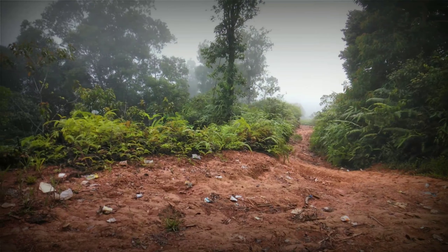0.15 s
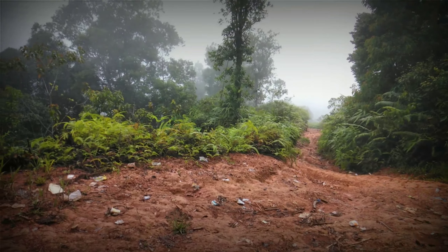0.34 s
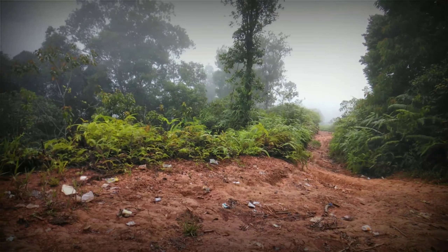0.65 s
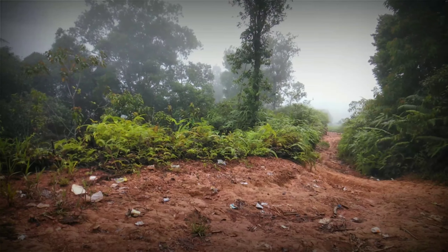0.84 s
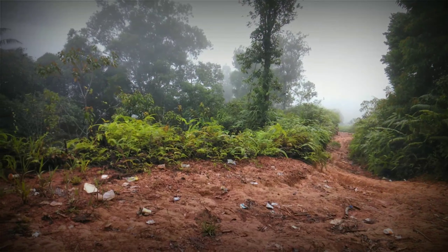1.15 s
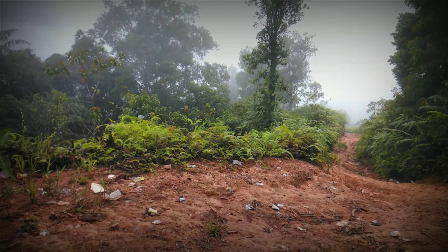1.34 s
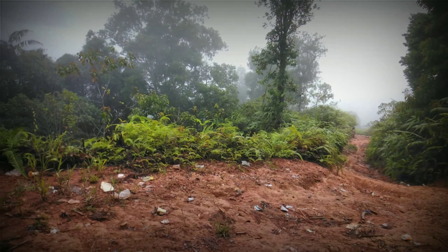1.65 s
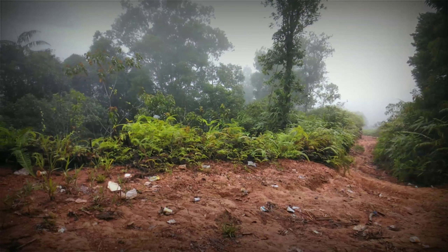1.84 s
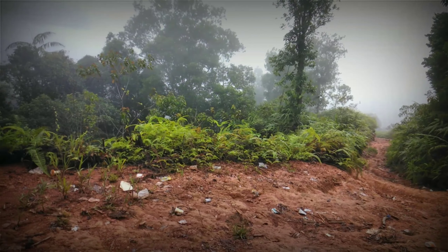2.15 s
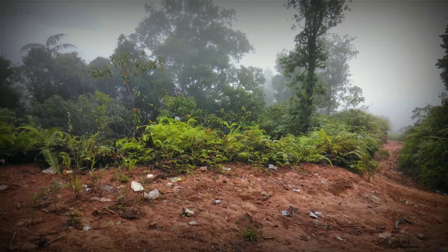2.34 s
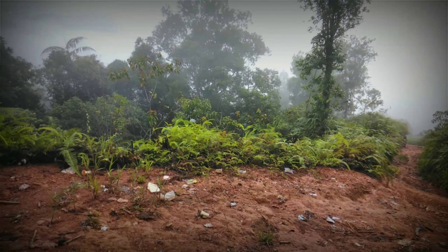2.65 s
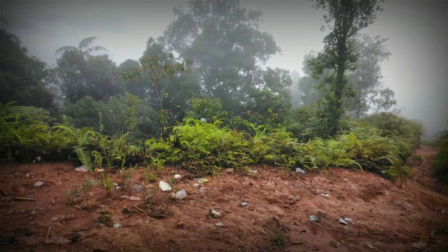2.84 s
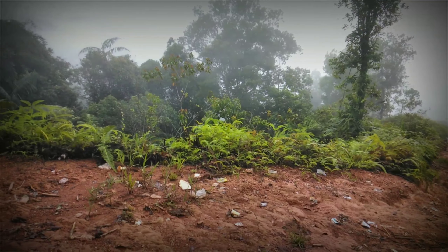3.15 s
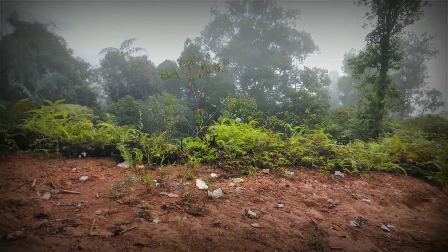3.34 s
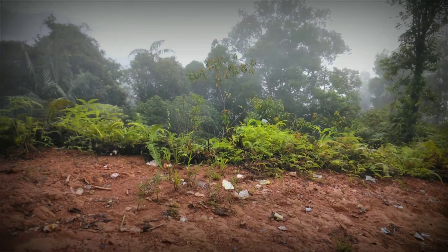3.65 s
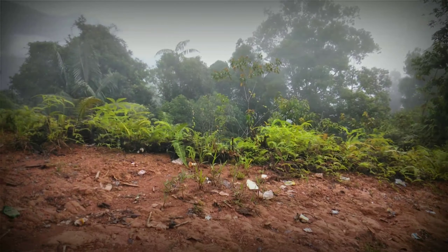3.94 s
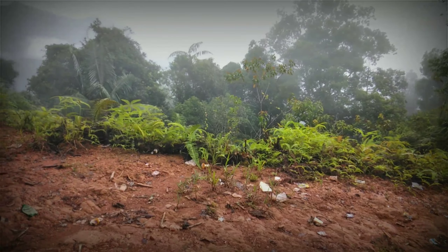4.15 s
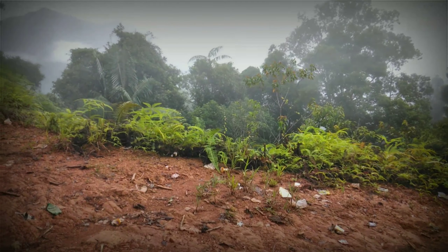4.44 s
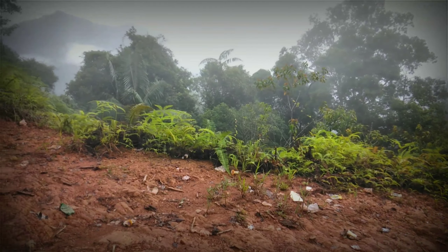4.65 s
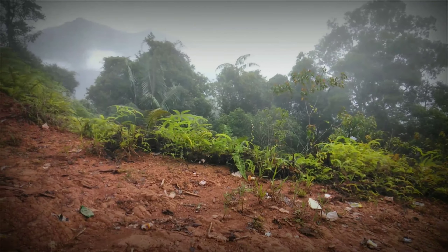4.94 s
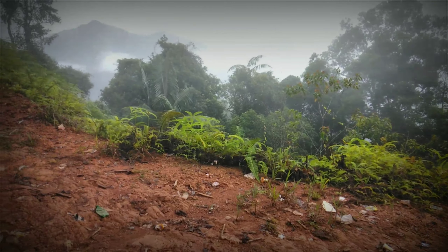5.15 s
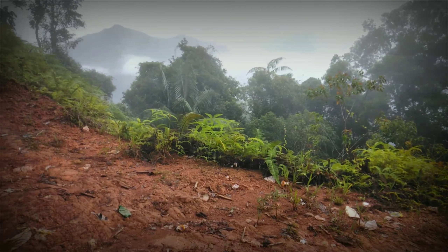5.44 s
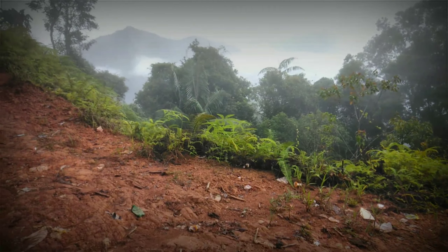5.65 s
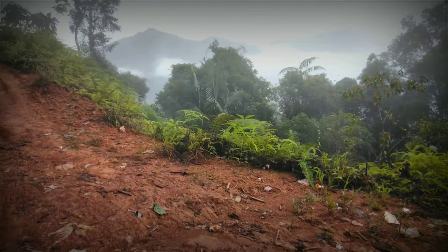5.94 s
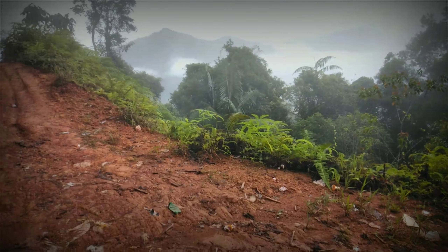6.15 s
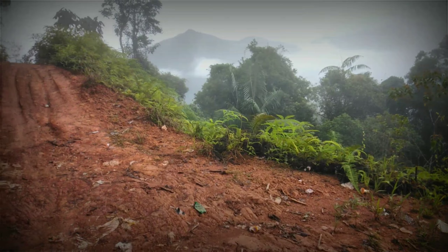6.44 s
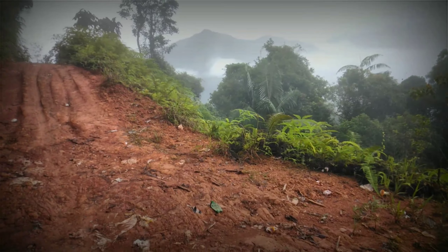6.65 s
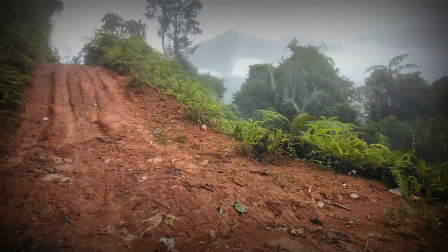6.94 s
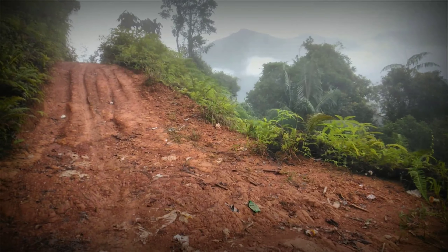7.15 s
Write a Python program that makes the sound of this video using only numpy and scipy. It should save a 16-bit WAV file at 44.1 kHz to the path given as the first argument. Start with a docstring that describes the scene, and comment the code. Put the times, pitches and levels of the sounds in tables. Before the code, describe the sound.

Insects trill, chirp and tick over a high hiss in a forest, with a brief rising birdcall and a few gritty shoe scuffs.

```python
"""Insects on a misty forest ridge. From the start, over a hissing chorus and low air, a cricket's wings
chirp falling double notes, a katydid's wing teeth tick very high and shoes shift on a gritty track.
Near 1 s a throbbing trill emerges and a bird whistles a rising phrase among the trees. Near 3 s thin
rising buzzes pass overhead. From 5.5 s the shoes crunch harder, the bird calls faintly, a higher trill
joins and the ticks grow stronger; the buzzes return near 7 s."""
import sys
import numpy as np
from scipy import signal
from scipy.fft import rfft, irfft, next_fast_len
from scipy.io import wavfile

SR = 44100
rng = np.random.default_rng(int(sys.argv[2]) if len(sys.argv) > 2 else 0)


def generate_wav(sig):
    """Save sig (samples, or channels by samples) to the path in sys.argv[1] as 16-bit PCM at SR."""
    pcm = np.round(np.clip(np.atleast_2d(sig).T, -1, 1) * 32767).astype(np.int16)
    wavfile.write(sys.argv[1], SR, pcm)


N = 321481


def from_db(db):
    """Decibels to gain."""
    return 10 ** (np.asarray(db) / 20)


def rms_one(x):
    """Scale to unit rms."""
    return x / np.sqrt(np.mean(x ** 2) + 1e-20)


def at(rows, s):
    """Value of a two-column curve at time s."""
    return np.interp(s, *np.transpose(rows))


def in_time(rows):
    """Columns of a curve table at every sample."""
    s, *columns = np.transpose(rows)
    return [np.interp(np.arange(N) / SR, s, c) for c in columns]


def add(out, s, sound):
    """Mix a sound in at time s."""
    i = round(s * SR)
    part = sound[max(-i, 0):max(N - i, 0)]
    out[max(i, 0):max(i, 0) + len(part)] += part


def beats(lag, period_s):
    """Start times of an even rhythm shifted by a lag curve."""
    even = np.arange(int(N / SR / period_s) + 1) * period_s
    return even + at(lag, even)


def drift(rate_hz, size=N):
    """Random wander, spread about 1."""
    steps = np.arange(size) * rate_hz * 2 / SR
    knots = rng.standard_normal(int(steps[-1]) + 2)
    return np.interp(steps, np.arange(len(knots)), knots) * np.sqrt(3 / 2)


def colour(x, spectrum):
    """Shape by a spectrum that falls away past its ends; white noise keeps its power."""
    size = next_fast_len(len(x))
    hz, db = np.transpose(spectrum)
    f = np.fft.rfftfreq(size, 1 / SR) + 1
    outside = np.abs(np.log(f / np.clip(f, hz[0], hz[-1])))
    gain = from_db(np.interp(np.log(f), np.log(hz), db) - 200 * outside)
    return irfft(rfft(x, size) * rms_one(gain), size)[:len(x)]


def noise_band(spectrum, flicker_db, rate_hz):
    """Flickering coloured noise at unit rms."""
    noise = rng.standard_normal(N) * from_db(flicker_db * drift(rate_hz))
    return rms_one(colour(noise, spectrum))


def forest(x, t60_s, wet_db):
    """Trunks and leaves scatter a dying tail behind the direct sound."""
    t = np.arange(SR) / SR
    tail = rng.standard_normal(SR) * from_db(-60 * t / t60_s) * (1 - np.exp(-t / 0.0069))
    return x + from_db(wet_db) * signal.fftconvolve(x, tail / np.linalg.norm(tail))[:N]


def glides(rows, waver, waver_hz, bend):
    """Gliding whistles; a fast pitch waver turns them into buzzes."""
    out = np.zeros(N)
    for start_s, length_s, from_hz, to_hz, db in rows:
        u = np.linspace(0, 1, int(length_s * SR))
        pitch_hz = (from_hz + (to_hz - from_hz) * u ** bend) * (1 + waver * drift(waver_hz, len(u)))
        swell = np.abs(np.sin(np.pi * u)) ** 0.5 * from_db(2 * drift(65, len(u)))
        add(out, start_s, from_db(db) * swell * np.sin(2 * np.pi * np.cumsum(pitch_hz) / SR))
    return out


def air():
    """Air stirs with a low rumble."""
    spectrum = [(8, 29), (18, 22.5), (30, 14), (60, 8), (100, 5.5), (165, 7), (205, 1.5), (250, -4),
                (400, -4), (700, -4), (1100, -7), (1450, -7), (3500, -12), (16000, -16)]  # freq_hz, relative_db
    return from_db(-45.7) * noise_band(spectrum, flicker_db=1.2, rate_hz=12)


def chorus():
    """Far trills, crickets and a high hiss: many voices merge into bands of noise."""
    # band spectra: freq_hz, relative_db
    trill_band = [(4700, -33), (5200, -17), (5500, -7.5), (5750, -6), (5900, -6), (6100, -1.5), (6300, 0),
                  (6600, 3), (6850, -2.5), (7030, -5.5), (7150, -17), (7500, -23.5), (7900, -43.5)]
    cricket_band = [(3650, -21), (3950, -5), (4150, 1), (4280, -1), (4450, -2.5), (4750, -17.5),
                    (5100, -25.5)]
    hiss_band = [(10000, -27), (11700, -16.5), (12500, -9.5), (13500, -3.5), (14300, -6.5), (15000, 1),
                 (16000, 1)]
    hiss_level = [(0, -45), (2.5, -44), (4, -44.5), (5.6, -42.5), (7.3, -44.5)]  # time_s, level_db
    trills = from_db(-44) * noise_band(trill_band, flicker_db=1, rate_hz=110)
    crickets = from_db(-58) * noise_band(cricket_band, flicker_db=0.5, rate_hz=27)
    hiss = from_db(in_time(hiss_level)[0]) * noise_band(hiss_band, flicker_db=2.5, rate_hz=250)
    return trills + crickets + hiss


def high_singers():
    """Far insects: a thin 8 kHz band and a 15 kHz sizzle swell almost together."""
    # band spectra: freq_hz, relative_db
    thin_band = [(7400, -15), (7900, -4), (8270, 1.5), (8430, -4), (8600, -17)]
    sizzle_band = [(14000, -16), (14600, -9), (15000, 1), (15350, -2.5), (16000, 1)]
    swells = [(0, -66, -42), (.4, -71, -47.5), (.9, -68, -46), (1.45, -64, -40), (2.6, -60, -40),
              (3, -61, -44), (3.9, -66, -42), (4.7, -73, -46.5), (5.8, -68, -45), (6.3, -62.5, -41.5),
              (7.3, -64, -42.5)]  # time_s, thin_db, sizzle_db
    thin_gain, sizzle_gain = from_db(in_time(swells))
    thin = thin_gain * from_db(0.1) * noise_band(thin_band, flicker_db=0.5, rate_hz=75)
    return thin + sizzle_gain * noise_band(sizzle_band, flicker_db=0.3, rate_hz=170)


def bird():
    """Whistled notes, mostly rising, ring among the trees."""
    notes = [(1.01, 0.059, 2410, 2430, -54), (1.08, 0.098, 2590, 2707, -49.5),
             (1.17, 0.09, 2980, 3250, -44), (1.245, 0.048, 3674, 3785, -40.5),
             (1.355, 0.056, 3180, 3280, -41.5), (1.385, 0.037, 3280, 3460, -41.5),
             (5.525, 0.04, 2730, 3140, -51.5), (5.72, 0.062, 2080, 2040, -58),
             (5.825, .04, 2054, 2080, -55.5)]  # start_s, length_s, from_hz, to_hz, level_db
    return forest(glides(notes, waver=0.013, waver_hz=123, bend=0.66), t60_s=0.654, wet_db=-1.5)


def buzzes():
    """Thin glides overhead, roughened by a fast pitch waver."""
    notes = [(2.78, .12, 7620, 8150, -45), (2.87, 0.16, 8000, 8200, -46), (2.99, 0.071, 8250, 8540, -44),
             (3.28, 0.136, 7450, 7900, -44.5), (3.37, 0.11, 7900, 8230, -45.5),
             (6.78, 0.023, 7430, 7160, -43.5), (7.14, 0.098, 7500, 7700, -47.5),
             (7.21, .12, 7800, 8050, -48.5)]  # start_s, length_s, from_hz, to_hz, level_db
    return forest(glides(notes, waver=0.02, waver_hz=388, bend=0.83), t60_s=0.43, wet_db=-5)


def scuffs(grain_db):
    """A sole grinds grit and finer sand: dense uneven cracks under a quick swell."""
    steps = [(0.091, 0.073, -66, 23), (0.312, 0.055, -56, -10), (0.549, .06, -54.5, -3),
             (2.564, 0.083, -53.5, -1), (3.492, 0.085, -55, -8), (5.615, 0.059, -34.5, -4),
             (5.797, 0.11, -52.5, -11.5), (6.507, 0.11, -38.5, 0.5), (6.644, 0.036, -49, -8),
             (6.722, 0.11, -50, -10)]  # start_s, length_s, level_db, sand_share_db
    # ground spectra: freq_hz, relative_db
    grit_band = [(120, -16), (300, -12), (450, -13), (700, 0.5), (1100, -2), (1700, 1.5), (2600, 3),
                 (4000, -5.5), (6000, -1.5), (9000, -18), (15000, -42)]
    sand_band = [(1500, -1), (3000, -12), (7500, 0), (11000, -9.5), (16000, 10.5)]
    grit, sand = np.zeros(N), np.zeros(N)
    for start_s, length_s, db, sand_db in steps:
        u = np.arange(int(2 * length_s * SR)) / (length_s * SR)
        press = from_db(db) * np.interp(u, [0, .2, .4, .8, 1.1, 2], [.36, .95, .88, .55, .19, .044])
        for layer, gain in ((grit, 1), (sand, from_db(sand_db))):
            cracks = rms_one(rng.standard_normal(len(u)) * from_db(grain_db * drift(500, len(u))))
            add(layer, start_s, gain * press * cracks)
    return colour(grit, grit_band) + colour(sand, sand_band)


def stones(t60_s, gain_db, settle_per_s):
    """Stones knock underfoot with a short, broad ring; smaller grit settles at random."""
    knocks = [(.301, -44.5, 970), (.304, -45, 418), (.526, -42, 630), (1.328, -45.5, 2300),
              (2.032, -46.5, 2280), (2.653, -45, 1730), (3.53, -48, 440), (4.589, -50.5, 1620),
              (4.692, -48, 645), (4.858, -48, 2200), (5.255, -47, 1940), (5.312, -46.5, 2030),
              (5.612, -43, 2430), (5.63, -45.5, 483), (5.662, -36.5, 2600), (5.992, -47.5, 1820),
              (6.25, -48.5, 1900), (6.74, -42.5, 2500)]  # start_s, relative_peak_db, ring_hz
    draws = rng.random((int(settle_per_s * N / SR), 3))
    settling = [(when * N / SR, -55 + 4 * size, 1400 + 1000 * pitch) for when, size, pitch in draws]
    t, out = np.arange(SR // 20) / SR, np.zeros(N)
    for start_s, db, ring_hz in knocks + settling:
        body = signal.butter(1, [ring_hz * 0.62, ring_hz * 1.38], "band", fs=SR, output="sos")
        impact = rng.standard_normal(len(t)) * from_db(-60 * t / t60_s)
        knock = signal.sosfilt(np.vstack([body, body]), impact)
        add(out, start_s, from_db(db + gain_db) * knock / np.abs(knock).max())
    return out


def trill(pulses, rate_hz, pitch_hz, waver, uneven_db, lag_cycles=0):
    """Short pulses of a wavering wing tone, grouped in a repeating cycle."""
    cycle = np.arange(N) / SR * rate_hz - lag_cycles
    beat = sum(strength * np.exp(-.5 * (((cycle - place + .5) % 1 - .5) / width) ** 2)
               for place, width, strength in pulses)
    tone = np.sin(2 * np.pi * np.cumsum(pitch_hz * (1 + waver * drift(600))) / SR)
    return forest(beat * tone * from_db(uneven_db * drift(40)), t60_s=0.13, wet_db=-7)


def trillers(gain_db):
    """Four insects: a near trill, a higher late one, a slow throb and a faint low rattle."""
    # pulses of one cycle: place_cycles, width_cycles, strength
    trill_pulses = [(.66, 0.049, 0.87), (.87, 0.039, 0.98)]
    throb_pulses = [(.28, 0.06, 0.95), (.40, 0.017, 0.39)]
    rattle_pulses = [(.2, .04, 0.44), (.43, 0.036, 0.51), (.66, .04, .8)]
    near_song = [(0, -66, .196), (.8, -45, 0.17), (2, -44.5, .066), (3, -40, 0.053), (4.1, -41.5, 0.037),
                 (4.7, -36.5, 0.042), (5.8, -38, 0), (6.4, -40, 0.16), (7.3, -44, .16)]  # time_s, relative_db, lag_cycles
    # swells: time_s, relative_db
    late_song = [(5.4, -70), (5.75, -46), (7.3, -48)]
    throb_song = [(0, -58), (1.2, -40), (1.9, -46), (2.6, -56), (3.3, -41), (3.7, -58), (6.2, -56),
                  (7.3, -57)]
    rattle_song = [(0, -78), (2.3, -74.5), (2.7, -51), (3.8, -51), (4.3, -74), (7.3, -72)]
    _, lag = in_time(near_song)
    near = trill(trill_pulses, rate_hz=16.25, pitch_hz=6780, waver=0.00882, uneven_db=2, lag_cycles=lag)
    late = trill(trill_pulses, rate_hz=16, pitch_hz=7010, waver=0.0041, uneven_db=2.5)
    throb = trill(throb_pulses, rate_hz=8.1, pitch_hz=6740, waver=0.01597, uneven_db=2.5)
    rattle = trill(rattle_pulses, rate_hz=8.4, pitch_hz=4820, waver=0.0252, uneven_db=0)
    voices = (near, near_song), (late, late_song), (throb, throb_song), (rattle, rattle_song)
    return sum(from_db(in_time(song)[0] + gain_db) * voice for voice, song in voices)


def katydid(gain_db, decay_s, uneven_db, second_tooth_db):
    """Each wing stroke snaps two teeth in quick succession; each snap dies within a millisecond."""
    stroke_lag = [(0, 0.0143), (0.95, 0.0247), (1.85, 0.0175), (2.35, 0.0216), (2.95, 0.0178),
                  (3.9, 0.0179), (4.35, 0.0209), (5.05, 0.0145), (5.55, 0.0175), (5.85, 0.0112),
                  (6.9, 0.0135), (7.25, 0.0172)]  # time_s, lag_s
    stroke_level = [(0, -44), (.85, -53), (1.05, -40.5), (2.1, -42.5), (2.55, -39), (4.5, -41.5),
                    (5.4, -39), (6.1, -35.2), (7.25, -34.8)]  # time_s, relative_db
    hard_snaps = [(3.888, 2.5), (4.778, 3.5), (4.892, 2.5), (5.122, 3), (6.243, 2.5), (6.32, 3), (6.708, 2),
                  (6.747, 2), (6.864, 2.5), (7.177, 3)]  # time_s, extra_db
    low_edge = [(0, 14000), (3.8, 13750), (4.5, 13200), (6, 12740), (7.3, 13100)]  # time_s, edge_hz
    starts_s = beats(stroke_lag, period_s=.0387)
    tooth_gaps_s = rng.uniform(.0016, .0021, len(starts_s))
    levels_db = at(stroke_level, starts_s) + gain_db + uneven_db * rng.standard_normal(len(starts_s))
    for time_s, extra_db in hard_snaps:
        levels_db[np.argmin(np.abs(starts_s - time_s))] += extra_db
    t, out = np.arange(SR // 250) / SR, np.zeros(N)
    for start_s, gap_s, db in zip(starts_s, tooth_gaps_s, levels_db):
        wing = signal.butter(4, [at(low_edge, start_s), 16000], "band", fs=SR, output="sos")
        for k in range(2):
            force = .15 * rng.standard_normal(len(t)) * np.exp(-t / decay_s)
            force[0] = 2  # the tooth lets go, then scrapes briefly
            snap = from_db(db + k * second_tooth_db) * rms_one(signal.sosfilt(wing, force))
            add(out, start_s + k * gap_s, snap)
            add(out, start_s + k * gap_s + .0085, from_db(-18) * snap)  # ground echo
    return forest(out, t60_s=0.096, wet_db=-14)


def cricket(spacing_s, second_note_db):
    """Two wing closures a chirp, each a pure tone that sags in pitch as the wing slows."""
    closure = [(0, 4200, 0), (.012, 4180, 1), (.019, 4115, .85), (.026, 4005, .42), (.033, 3890, .2),
               (.038, 3800, 0)]  # time_s, pitch_hz, amplitude
    voice = [(0, 24, -10), (1.6, 6, -5), (2.8, -10, 6.5), (4, -37, 7)]  # time_s, shift_hz, half_tilt_db
    chirp_lag = [(0, -0.011), (0.9, -0.0294), (1.8, -0.0337), (3.6, -0.0332), (4.5, -0.0147),
                 (5.9, -0.0278), (7.1, -0.011)]  # time_s, lag_s
    chirp_level = [(0, -39.1), (1.35, -36.5), (2.35, -40.0), (3.3, -46.5), (4.15, -40.5), (5.05, -46.5),
                   (6.2, -47.5), (7.1, -41.5)]  # time_s, level_db
    closure_s, closure_hz, amplitude = np.transpose(closure)
    voice_s, shift_hz, half_tilt_db = np.transpose(voice)
    t, out = np.arange(int(closure_s[-1] * SR)) / SR, np.zeros(N)
    for start_s in beats(chirp_lag, period_s=.2145):
        tilt_db = np.interp(start_s, voice_s, half_tilt_db) * (2 * t / closure_s[-1] - 0.67)
        swell = np.interp(t, closure_s, amplitude) * from_db(at(chirp_level, start_s) + tilt_db)
        sag_hz = np.interp(t, closure_s, closure_hz) + np.interp(start_s, voice_s, shift_hz)
        for k in range(2):
            pitch_hz = sag_hz * (1 + 0.0022 * drift(153, len(t)))
            note = swell * np.sin(2 * np.pi * np.cumsum(pitch_hz) / SR)
            add(out, start_s + k * spacing_s, from_db(k * second_note_db) * note)
    return forest(out, t60_s=0.08, wet_db=-8)


def scene():
    """Near insects, the surrounding forest and shoes, in mono."""
    ticks = katydid(gain_db=1.6, decay_s=.0003, uneven_db=.7, second_tooth_db=-2.5)
    near = ticks + cricket(spacing_s=.042, second_note_db=-0.05) + trillers(gain_db=2)
    far = chorus() + high_singers() + air() + bird() + buzzes()
    feet = scuffs(grain_db=3) + stones(t60_s=0.027, gain_db=7, settle_per_s=1.8)
    return (near + far + feet)[None]


def record(dry):
    """Steep low-pass at 15460 Hz."""
    return signal.sosfilt(signal.ellip(12, .1, 70, 15460, fs=SR, output="sos"), dry)


dry = scene()
out = record(dry)
generate_wav(out)
```